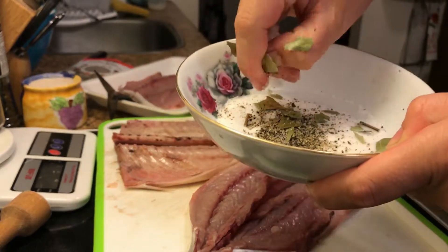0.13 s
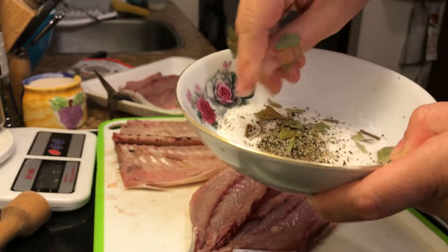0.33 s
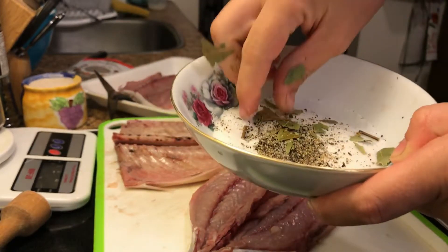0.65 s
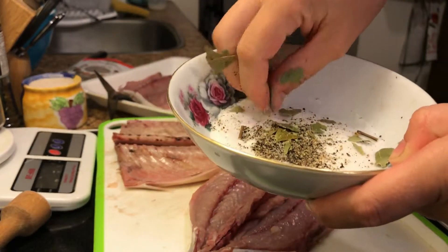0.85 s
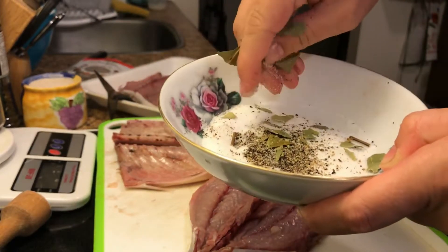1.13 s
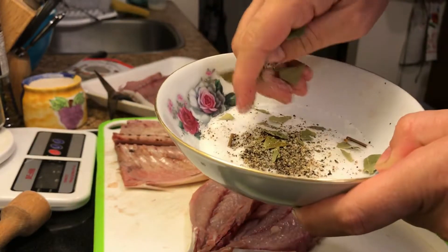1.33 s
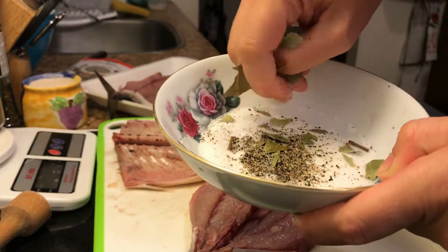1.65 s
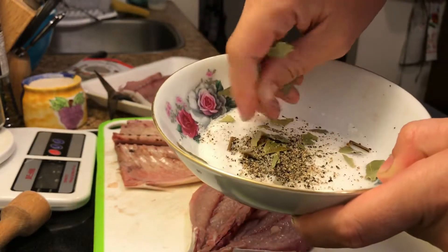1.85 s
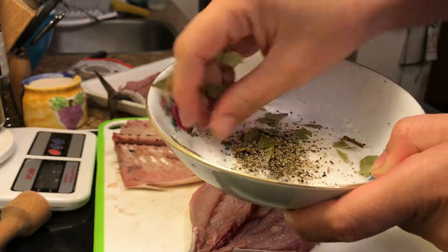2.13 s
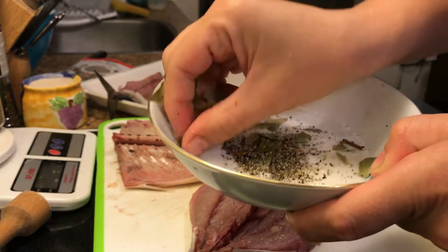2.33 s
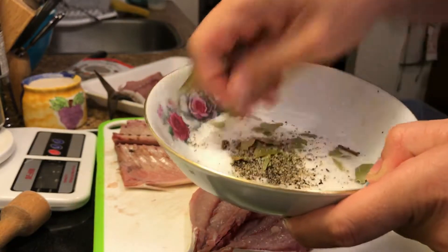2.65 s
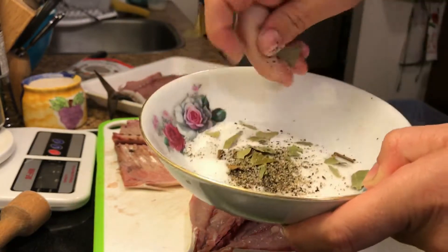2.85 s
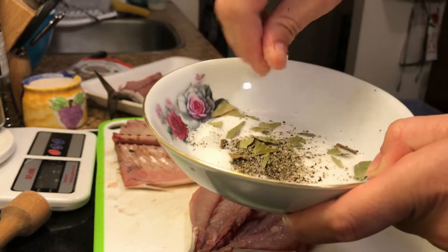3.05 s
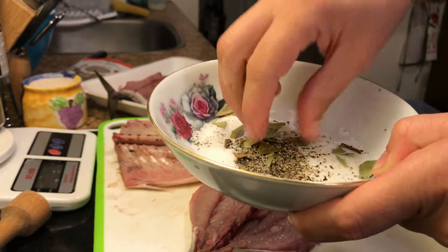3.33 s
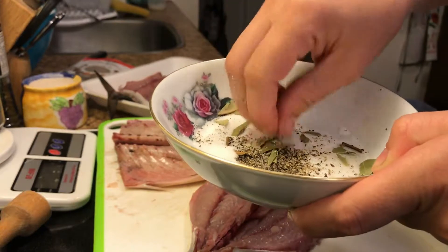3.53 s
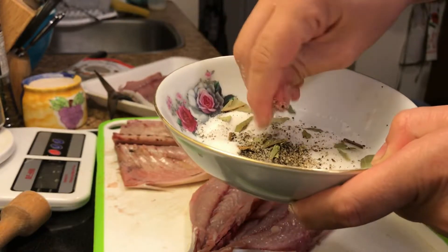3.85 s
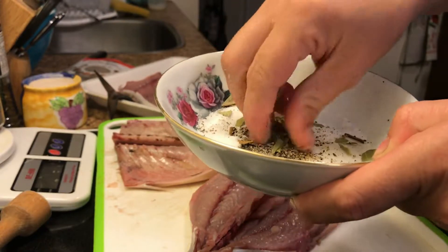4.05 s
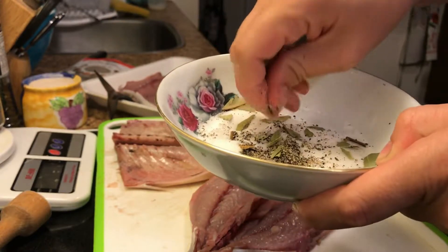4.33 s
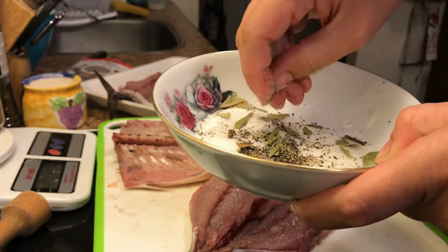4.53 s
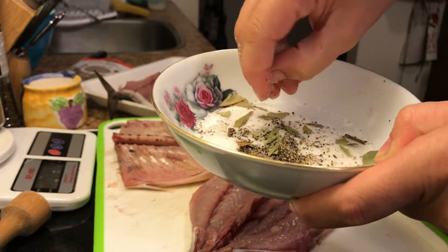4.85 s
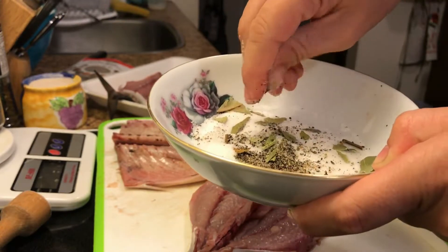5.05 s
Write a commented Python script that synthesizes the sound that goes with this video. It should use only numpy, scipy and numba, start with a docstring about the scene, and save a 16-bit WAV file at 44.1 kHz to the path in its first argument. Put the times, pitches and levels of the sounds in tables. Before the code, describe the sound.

Close, crisp snaps of dry leaves crumbled by hand, with grit scraping a china bowl over a low hum and hiss.

```python
"""In a kitchen, fingers snap and rub dry leaves over a china bowl of salt, close to the microphone.
Each snap is a burst of tiny cracks with a short room echo; loud ones carry a knock. Grit scrapes the
bowl, and falling pieces make it ring. Behind this a fridge hums, with soft thuds and a low rumble.
A broad hiss lies under it all and is louder for a while after the loudest snaps."""
import sys
import numpy as np
from scipy import signal
from scipy.fft import rfft, irfft
from scipy.io import wavfile
from scipy.ndimage import uniform_filter1d
from numba import njit

SR = 44100
rng = np.random.default_rng(int(sys.argv[2]) if len(sys.argv) > 2 else 0)


def waveform_to_disk(signal):
    """Save audio, clipped to [-1, 1], as 16-bit WAV at the path in sys.argv[1]."""
    frames = np.transpose(np.atleast_2d(signal))
    scaled = np.clip(frames, -1, 1) * 32767
    samples = np.round(scaled).astype(np.int16)
    wavfile.write(sys.argv[1], SR, samples)


N = 229302

# The cracks that stand out: start_s, treble_db, upper_middle_db, low_db
LOUD_CRACKS = [(0.0192, -25, -27.5, -44), (0.0232, -11, -13, -42), (0.0246, -10, -20, -38),
               (0.0338, -13, -16, -49), (0.038, -14, -30, -25), (0.0629, -13, -26.5, -48),
               (0.0683, -20, -30, -53), (0.1037, -29, -39, -52), (0.12, -33, -35, -50),
               (0.249, -34, -29, -52), (0.2656, -33, -37, -37), (0.36, -40, -31, -58),
               (0.3655, -1, -8.5, -19), (0.3686, -1.5, -42, -38), (0.3697, -8, -36, -43),
               (0.3772, -20, -43, -53), (0.3796, -21, -40, -48), (1.0223, -34, -32, -42),
               (1.0744, -30, -32, -61), (1.12, -48, -41, -55), (1.1401, -54, -36, -45),
               (1.173, -41, -44, -60), (1.242, -34, -43, -66), (1.3278, -36, -43, -66),
               (1.3565, -31, -36, -52), (1.3749, -28, -33.5, -56), (1.4597, -38, -52, -62),
               (1.4767, -43, -53, -62), (1.501, -5.5, -25, -31), (1.505, -22, -30, -38),
               (1.5123, 1, -9, -11.5), (1.5156, -4, -12.5, -24), (1.557, -17, -23, -26.5),
               (1.5728, -35, -35, -42), (1.5822, -27, -28, -50), (1.6339, -32, -41, -56),
               (1.6496, -30, -45, -49), (1.7313, -24, -38, -56), (1.7816, -16.5, -27, -54),
               (1.7955, -33, -37, -56), (1.8806, -20, -31, -61), (1.925, -28, -41, -56),
               (1.951, -28, -48, -58), (2.097, -37, -37, -52), (2.1797, -46, -42, -59),
               (2.186, -53, -39, -60), (2.193, -50, -40, -66), (2.2222, -47, -41, -56),
               (2.2562, -47, -41, -40), (2.491, -37, -36, -41), (2.5847, -44, -46, -37.5),
               (2.7132, -42, -45, -47), (2.802, -52, -47, -60), (2.834, -45, -49, -60),
               (2.85, -30.5, -35.5, -55), (2.8683, -39, -45, -54), (2.898, -38, -44, -64),
               (2.9133, -44, -32, -64), (2.9462, -29, -29.5, -44), (3.026, -39, -41, -39),
               (3.0298, -35, -30.5, -41), (3.172, -52, -43, -60), (3.0791, -40, -42, -55),
               (3.1434, -38, -47, -56), (3.2042, -43, -38, -43), (3.2106, -45, -40, -45),
               (3.2311, -43, -44, -45), (3.297, -38, -29, -40), (3.3097, -39, -44, -54),
               (3.524, -5.5, -6.5, -17), (3.5258, -24, -14, -35), (3.546, -33, -28, -47),
               (3.5484, -34, -22, -33), (3.6103, 3, -10, -29), (3.7217, -32, -41, -58),
               (3.7654, -28, -47, -54), (3.8117, -31, -34, -49), (3.817, -25, -12, -26),
               (4.217, -47, -37, -41), (4.236, -39, -49, -45), (4.2601, -50, -41, -43),
               (4.3762, -24, -25.5, -38), (4.386, -28, -32, -58), (4.4005, -37, -37, -51),
               (4.4112, -32, -38, -48), (4.4232, -43, -28, -37), (4.44, -32, -28, -43),
               (4.597, -32, -43, -42), (4.6522, -7, -23, -39), (4.6686, -23, -41, -56),
               (4.673, -19, -29, -54), (4.689, -28, -47, -52), (4.819, -23, -28.5, -51),
               (4.8659, -30, -40, -58), (4.8756, -40, -37, -58), (4.991, -23, -32, -60),
               (5.0032, -11.5, -19.5, -40), (5.0132, -30, -23.5, -35)]
# Typical strength of a faint crack: treble_db, upper_middle_db, low_db
FAINT_CRACK = [-50, -64, -57]
def leaf_tears(faint_count=60, spread_db=9.5, uneven_db=3.0, tear_s=0.0013):
    """A leaf tears in a dying run of tiny cracks. Gives four tracks, from treble to low."""
    faint_db = FAINT_CRACK + spread_db * rng.standard_normal((faint_count, 3))
    faint_s = rng.random(faint_count) * (N - 1) / SR
    cracks = np.vstack([LOUD_CRACKS, np.column_stack([faint_s, faint_db])])
    t = np.arange(1024) / SR
    noises = rng.standard_normal((len(cracks), len(t)))
    noises[:, 0] += 5  # the first break is one sharp step
    sizes = np.repeat(rng.standard_normal((len(cracks), 64)), 16, axis=1)
    tears = np.zeros((4, N + len(t)))
    for (start_s, treble_db, upper_db, low_db), noise, size in zip(cracks, noises, sizes):
        lower_db = upper_db + 0.47 * (low_db - upper_db) + 2  # the lower middle follows its neighbours
        fade_s = max(tear_s * gain(0.2 * upper_db), 1e-4)  # louder tears last longer
        tear = noise * gain(uneven_db * size) * np.exp(-t / fade_s)
        tear /= np.sqrt(2) * rms(tear[:88])  # the first 2 ms set the strength
        start = int(start_s * SR)
        tears[:, start:start + len(t)] += np.outer(gain([treble_db, upper_db, lower_db, low_db]), tear)
    return tears[:, :N]


# How the room answers, from treble to low: low_hz, high_hz, echo_s (time to fade 60 dB), echo_db
ROOM_BANDS = [(12050, 18440, 0.067, -5.5), (5690, 10470, 0.056, -10), (2320, 6610, 0.09, -8.5),
              (917, 2860, 0.24, -10.5)]
def leaf_snaps(uneven_db=3.0):
    """Each tear is heard directly, then rings on in the room. The first echoes are lumpy."""
    out, t = 0, np.arange(SR // 3) / SR
    lumps = gain(uneven_db * wander(1000)[:len(t)] * np.exp(-t / 0.0081)) * (t > 0.0015)
    for tear, (low_hz, high_hz, echo_s, echo_db) in zip(leaf_tears(), ROOM_BANDS):
        tail = rng.standard_normal(len(t)) * 1000 ** (-t / echo_s) * lumps
        echo = signal.fftconvolve(tear, tail / np.sqrt(np.sum(tail ** 2)))[:N]
        out = out + band(tear + gain(echo_db) * echo, low_hz, high_hz)
    return out


# Finger strokes on leaves and salt: peak_s, middle_db, treble_db, pitch_hz, length_s
STROKES = [(.03, -49.5, -58, 7900, .2), (0.245, -49, -42, 8500, 0.057), (.395, -47, -32, 2900, 0.062),
           (.745, -45.5, -45, 5200, 0.088), (0.939, -49.5, -41.5, 3100, 0.056),
           (1.056, -47.5, -49, 6400, 0.15), (1.55, -40, -32, 8500, 0.07), (1.645, -52, -39, 5000, 0.038),
           (1.796, -54, -29, 8400, .012), (1.819, -49, -44, 8400, .035), (1.877, -56, -43, 5000, 0.047),
           (1.93, -51, -40, 8500, 0.05), (2.193, -66, -63, 8000, 0.045), (2.38, -54.5, -62, 5000, 0.028),
           (2.598, -55, -49, 8000, 0.027), (2.682, -51, -46, 4000, 0.057), (2.734, -56, -63, 6000, 0.036),
           (2.904, -56, -47, 7000, .03), (2.992, -42, -33.5, 8500, 0.066), (3.44, -43.5, -50, 4700, 0.061),
           (3.548, -36, -34, 3200, 0.035), (3.645, -43, -39.5, 8500, 0.13),
           (3.819, -26.5, -27, 8400, 0.024), (3.849, -36.5, -35, 8400, .025),
           (3.896, -58, -47, 6000, 0.055), (4.114, -39, -41, 6200, 0.045), (4.395, -43, -43, 6600, 0.11),
           (4.53, -46, -43, 5700, 0.094), (4.582, -53, -48, 5500, .03), (4.685, -64, -60, 5000, 0.22),
           (4.838, -54, -45, 8500, 0.039), (5.027, -36.5, -31, 6130, 0.06), (5.19, -47, -49, 3000, 0.069)]
# The faint rustle that goes on between strokes: middle_db, treble_db, pitch_hz
RUSTLE = (-62, -61.5, 5900)
def finger_rubs(grit_db=3.5, rise_share=0.57):
    """Grit under the fingers makes a bright scratch and a rasp pitched by the strongest stroke."""
    t = np.arange(0, N, 32) / SR
    peak_s, middle_db, treble_db, pitch_hz, length_s = np.transpose(STROKES)[:, :, None]
    rest_middle_db, rest_treble_db, rest_hz = RUSTLE
    push = swell(t - peak_s, rise_share * length_s, length_s / 2)
    strokes, rest = gain(middle_db) * push, gain(rest_middle_db)
    middle = strokes.sum(0) + rest
    treble = (gain(treble_db) * push).sum(0) + gain(rest_treble_db)
    centre_hz = ((strokes * pitch_hz).sum(0) + rest * rest_hz) / middle
    middle, treble, centre_hz = curves(np.transpose([t, middle, treble, centre_hz]))
    grit = rng.standard_normal((2, N)) * gain(grit_db * np.array([wander(600), wander(600)]))
    rasp = band(moving_band(grit[0], centre_hz, sharpness=0.43), 1960, 15300)
    scratch = band(grit[1], 9300, 19700)
    return middle * set_level(rasp, 0) + treble * set_level(scratch, 0)


# Short knocks and one squeak: peak_s, pitch_hz, width_hz, level_db, fall_s
KNOCKS = [(0.023, 1660, 1190, -26, 0.0032), (0.366, 724, 600, -28.5, 0.0027),
          (1.512, 940, 500, -33.5, .004), (1.512, 1900, 890, -23, 0.0063),
          (3.525, 1260, 1880, -18.5, 0.0011), (3.526, 3000, 700, -29, .003),
          (3.547, 3080, 696, -17.5, 0.0025), (4.5235, 5520, 650, -34, .025)]
def knocks(grit, rise_s=0.0013):
    """Short pitched knocks that give the loudest snaps their body, and one brief high squeak."""
    return sum(burst(grit, peak_s, pitch_hz, width_hz, level_db, rise_s, fall_s)
               for peak_s, pitch_hz, width_hz, level_db, fall_s in KNOCKS)


# Scrapes on the bowl: peak_s, pitch_hz, level_db, length_s
BOWL_SCRAPES = [(.266, 3170, -45.5, .008), (0.38, 3160, -44, 0.017), (0.936, 3200, -46, 0.015),
                (2.67, 3180, -52.5, .03), (2.722, 5600, -51.5, 0.028), (3.445, 4670, -46, 0.041),
                (4.073, 4660, -53, .025), (4.3, 3090, -56, 0.085), (4.394, 3240, -49, 0.046),
                (4.405, 6500, -41, 0.034), (4.49, 3120, -53.5, .06), (5.025, 6040, -36.5, 0.027)]
def bowl_scrapes(grit, width_share=0.16):
    """Grit dragged over the glaze sounds in one narrow band for a moment."""
    return sum(burst(grit, peak_s, pitch_hz, width_share * pitch_hz, level_db, length_s, length_s)
               for peak_s, pitch_hz, level_db, length_s in BOWL_SCRAPES)


# The bowl's own notes: pitch_hz, ring_s (time to fade 60 dB)
BOWL_NOTES = [(1170, 0.13), (2230, 0.064), (3420, 0.058), (4850, .04), (6520, 0.05), (8350, 0.035)]
# Small hits on the bowl: start_s, level_db, favoured_hz, spread_octaves
BOWL_TICKS = [(2.0975, -41.5, 4850, 0.22), (2.1927, -42, 6520, 0.18), (2.2225, -46.5, 4850, 1.8),
              (2.241, -42, 5500, 0.57), (2.254, -39, 5540, 0.5), (2.256, -43.5, 1510, 0.82),
              (3.204, -39, 6520, 0.14)]
def bowl_ticks(rise_s=0.00023):
    """A falling piece or a nail rings the bowl's notes near the pitch that its size favours."""
    out, t = np.zeros(N + SR // 4), np.arange(SR // 4) / SR
    pitch_hz, ring_s = np.transpose(BOWL_NOTES)[:, :, None]
    for start_s, level_db, favoured_hz, spread_octaves in BOWL_TICKS:
        phase = rng.random(pitch_hz.shape)
        share = np.exp(-0.5 * (np.log2(pitch_hz / favoured_hz) / spread_octaves) ** 2)
        notes = share * np.sin(2 * np.pi * (pitch_hz * t + phase)) * 1000 ** (-t / ring_s)
        start = int(start_s * SR)
        out[start:start + len(t)] += gain(level_db) * notes.sum(0) * np.minimum(t / rise_s, 1)
    return out[:N]


# Tones of the fridge motor: pitch_hz, level_db
MOTOR_TONES = [(120.2, -47), (197.7, -34), (247.1, -37), (395.4, -55.5), (445, -67.5), (592.8, -61)]
# Loudness of the low drone over time: time_s, level_db
DRONE_LEVELS = [(0, -44), (2, -43), (3.1, -42), (3.6, -58), (4.7, -54), (5.2, -44)]
# Soft, far thuds: peak_s, pitch_hz, level_db, length_s
FAR_THUDS = [(1.01, 153, -39.5, 0.18), (2.9, 147, -35, 0.107), (1.52, 60, -42, 0.094)]
def fridge(drone_hz=58.15):
    """The motor's tones waver a little, a low drone fades and returns, and soft thuds come and go."""
    hum, t = 0, np.arange(N) / SR
    for pitch_hz, level_db in MOTOR_TONES:
        loudness = gain(level_db + 0.84 * wander(12))
        cycles = pitch_hz * t + 0.089 * wander(6.9) + rng.random()
        hum = hum + loudness * np.sin(2 * np.pi * cycles)
    drone = gain(curves(DRONE_LEVELS)[0] + 0.5 * wander(8)) * np.sin(2 * np.pi * drone_hz * t)
    thuds = 0
    for peak_s, pitch_hz, level_db, length_s in FAR_THUDS:
        bump = np.exp(-(2 * (t - peak_s) / length_s) ** 2)
        thuds = thuds + gain(level_db) * bump * np.sin(2 * np.pi * pitch_hz * t)
    return np.sqrt(2) * (hum + drone + thuds)


# Tone of the rumble: pitch_hz, relative_db
RUMBLE_SHAPE = [(20, -23), (40, -11.5), (60, -6), (130, -2.5), (290, -6.5), (330, -13), (480, -20.5),
                (700, -22), (1300, -26), (2300, -35), (5000, -47), (16000, -81)]
def air_rumble():
    """The air in the room rumbles, low and steady."""
    return shaped_noise(RUMBLE_SHAPE, level_db=-39.5)


# Tone of the hiss: pitch_hz, relative_db
HISS_SHAPE = [(300, 9), (1000, 1.5), (1800, 2), (3000, 1.5), (6000, -0.5), (10300, -3), (14000, -2.5),
              (16000, -11)]
# When the hiss is louder: start_s, end_s
LOUD_HISS_TIMES = [(0.017, 0.8), (1.5, 1.962), (3.524, 4.02), (4.652, 5.27)]
def hiss(loud_db=-44, drop_db=13, linger_share=0.16, linger_s=0.24):
    """The hiss jumps up at each listed start and drops at its end; the last part fades slowly."""
    t = np.arange(N) / SR
    lift = np.zeros(N)
    for start_s, end_s in LOUD_HISS_TIMES:
        fading = linger_share * np.exp(-np.maximum(t - end_s, 0) / linger_s)
        lift = np.maximum(lift, (t > start_s) * np.where(t < end_s, 1, fading))
    return shaped_noise(HISS_SHAPE, loud_db) * gain(drop_db * (uniform_filter1d(lift, 200) - 1))


def gain(db):
    """Turn decibels into a number to multiply by."""
    return 10 ** (np.asarray(db) / 20)


def rms(x):
    """The average strength of a sound."""
    return np.sqrt(np.mean(x ** 2))


def set_level(x, level_db):
    """Bring a sound to a given average strength."""
    return x * gain(level_db) / rms(x)


def band(x, low_hz, high_hz):
    """Keep one range of pitches, boosted so that white noise stays as strong."""
    sos = signal.butter(3, [low_hz, high_hz], "bandpass", fs=SR, output="sos")
    return signal.sosfilt(sos, x) * np.sqrt(SR / 2 / (high_hz - low_hz))


@njit
def moving_band(x, centre_hz, sharpness):
    """Keep the pitches around a centre that moves."""
    out, band_state, low_state = np.empty(len(x)), 0., 0.
    for i in range(len(x)):
        step = np.tan(np.pi * centre_hz[i] / SR)
        passed = (band_state + step * (x[i] - low_state)) / (1 + step * (step + 1 / sharpness))
        band_state = 2 * passed - band_state
        low_state += 2 * step * passed
        out[i] = passed / sharpness
    return out


def shaped_noise(shape, level_db):
    """Noise whose tone follows rows of pitch_hz, relative_db."""
    pitch_hz, relative_db = np.transpose(shape)
    all_hz = np.maximum(np.arange(N // 2 + 1) * SR / N, 1)
    tone = gain(np.interp(np.log(all_hz), np.log(pitch_hz), relative_db))
    return set_level(irfft(rfft(rng.standard_normal(N)) * tone, N), level_db)


def wander(rate_hz):
    """A smooth random wobble, mostly between -1 and 1."""
    hold = int(SR / rate_hz)
    steps = np.repeat(rng.standard_normal(N // hold + 1), hold)
    return 1.3 * uniform_filter1d(uniform_filter1d(steps, hold), hold)[:N]


def curves(table):
    """Join timed rows with straight lines, one curve for each column of values."""
    time_s, *columns = np.transpose(table)
    return [np.interp(np.arange(N) / SR, time_s, column) for column in columns]


def swell(age_s, rise_s, fall_s):
    """A rounded rise to a peak at age 0, then a dying fall."""
    return np.exp(np.where(age_s < 0, -(age_s / rise_s) ** 2, -age_s / fall_s))


def burst(grit, peak_s, pitch_hz, width_hz, level_db, rise_s, fall_s):
    """One short swell of gritty noise around a pitch."""
    out = np.zeros(N)
    near = np.arange(max(int((peak_s - 0.15) * SR), 0), min(int((peak_s + 0.3) * SR), N))
    push = swell(near / SR - peak_s, rise_s, fall_s)
    noise = band(grit[near] * push, pitch_hz - width_hz / 2, pitch_hz + width_hz / 2)
    out[near] = set_level(noise, level_db) * rms(push)
    return out


def scene():
    """All the sounds meet at one microphone."""
    leaves = leaf_snaps() + finger_rubs()
    grit = rng.standard_normal(N) * gain(2.5 * wander(300))  # noise with a rough, flickering level
    close_sounds = leaves + knocks(grit) + bowl_scrapes(grit) + bowl_ticks()
    return (close_sounds + fridge() + air_rumble() + hiss())[None]


def record(dry, dip_hz=10450, dip_width_hz=800, dip_share=0.5):
    """The microphone's opening dulls one band, the loudest peaks clip, and the top falls in two steps."""
    dip = signal.lfilter(*signal.iirpeak(dip_hz, dip_hz / dip_width_hz, SR), dry)
    gentle_cut = signal.ellip(5, 0.2, 11, 15750, fs=SR, output="sos")
    steep_cut = signal.ellip(7, 0.1, 35, 16494, fs=SR, output="sos")
    softened = signal.sosfiltfilt(gentle_cut, dry - dip_share * dip)
    return signal.sosfiltfilt(steep_cut, np.clip(softened, -0.95, 0.95))


dry = scene()
out = record(dry)
waveform_to_disk(out)
```